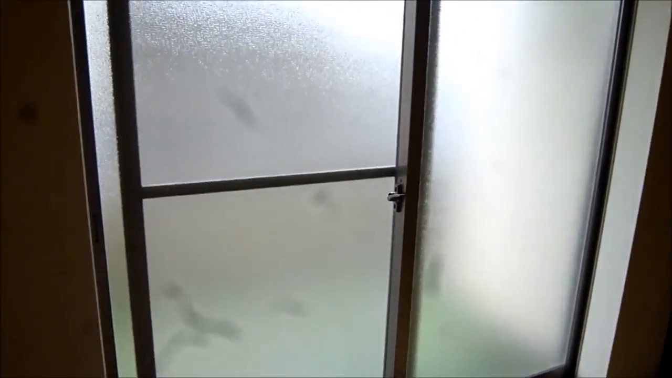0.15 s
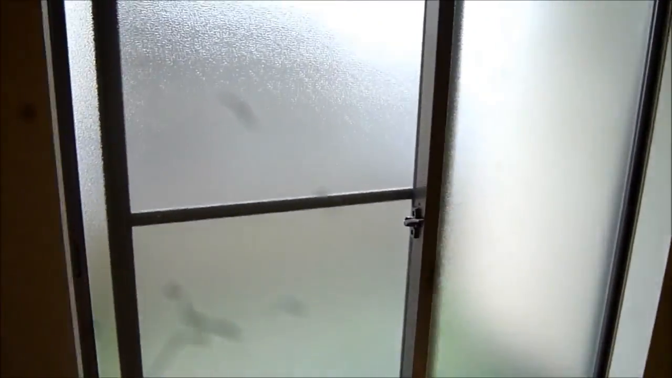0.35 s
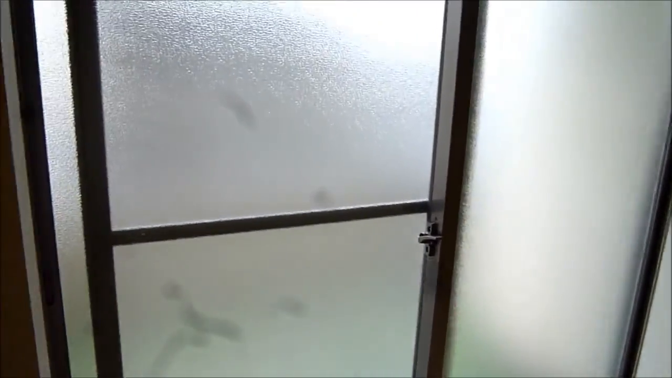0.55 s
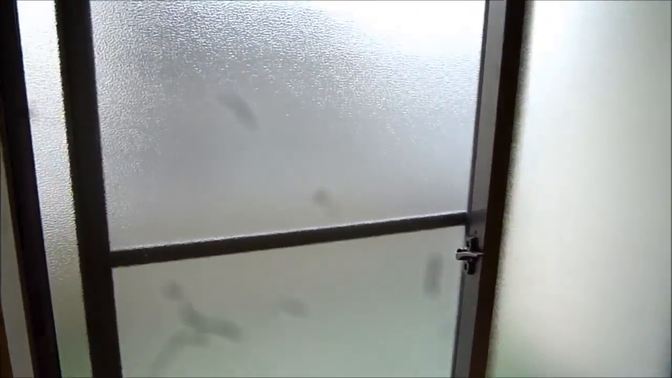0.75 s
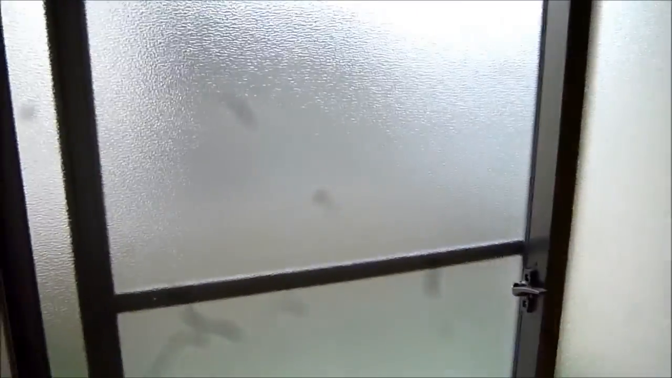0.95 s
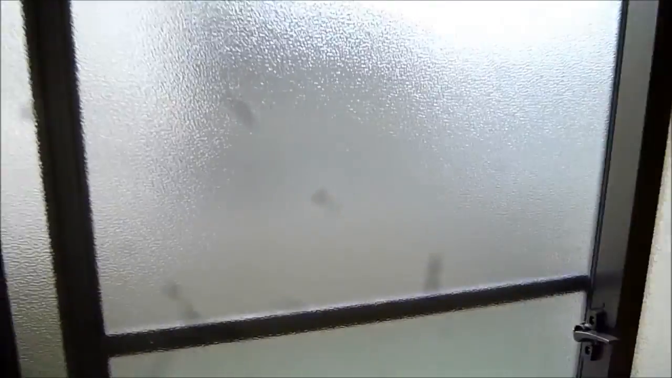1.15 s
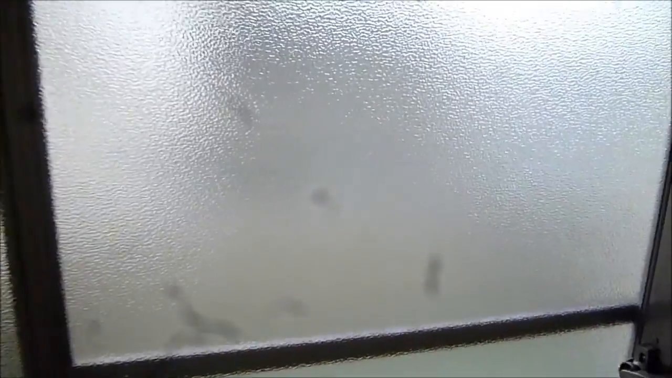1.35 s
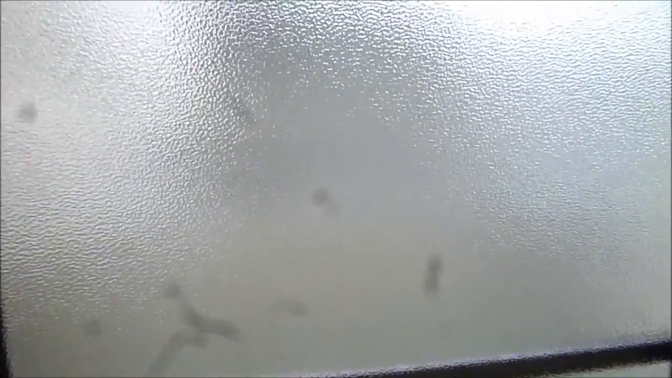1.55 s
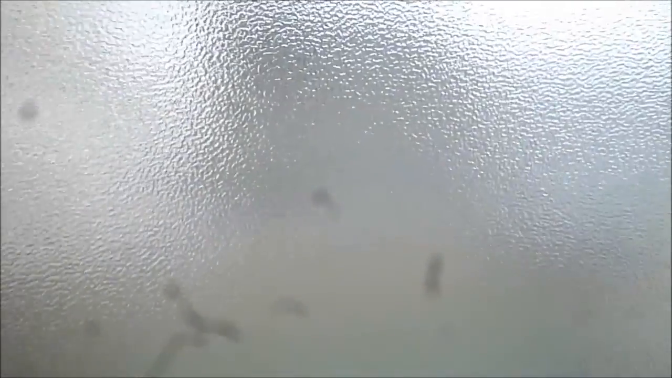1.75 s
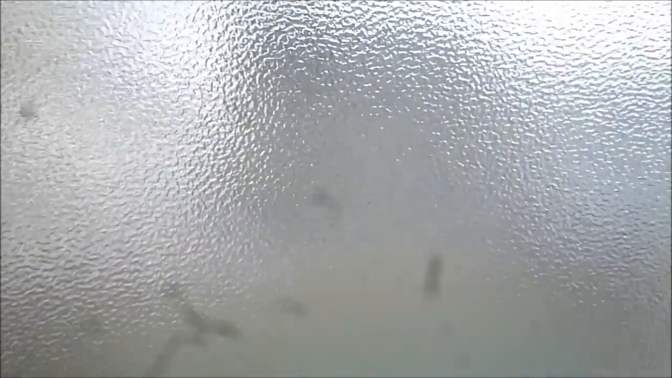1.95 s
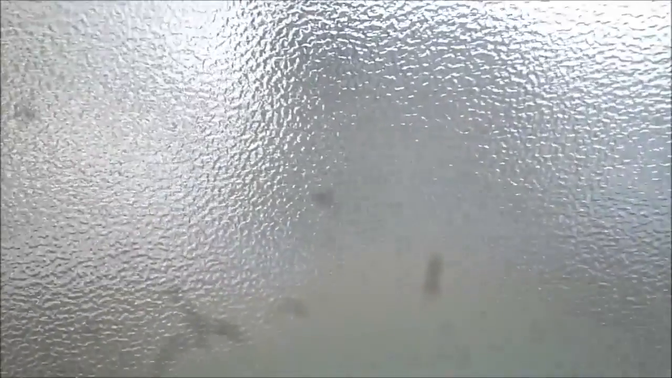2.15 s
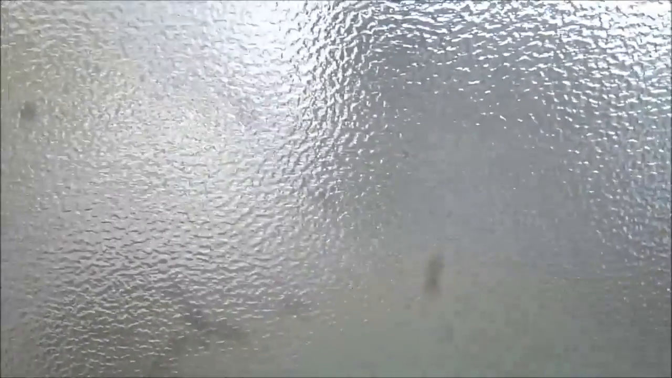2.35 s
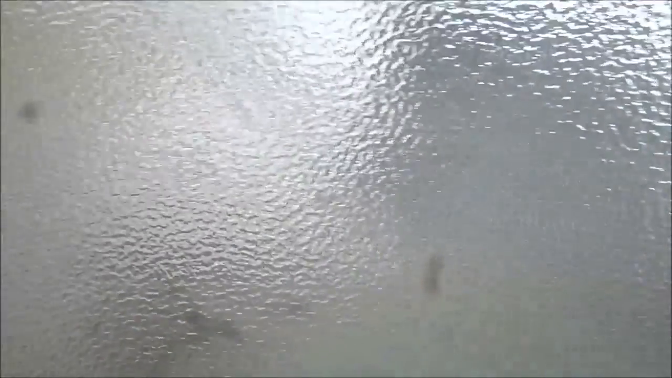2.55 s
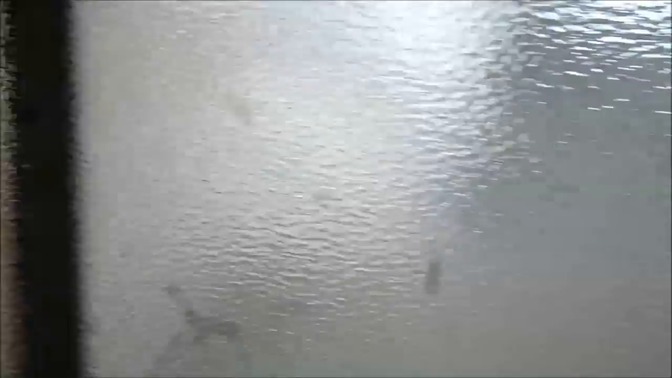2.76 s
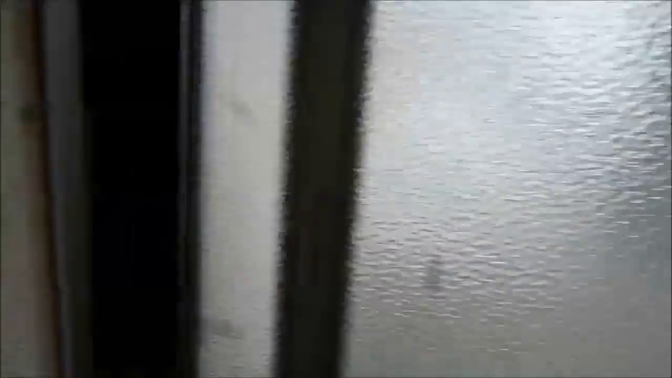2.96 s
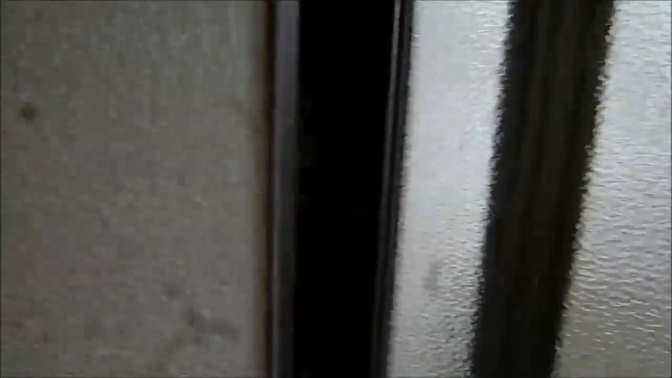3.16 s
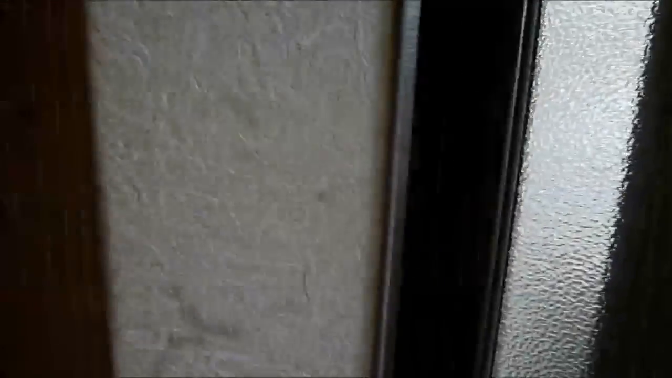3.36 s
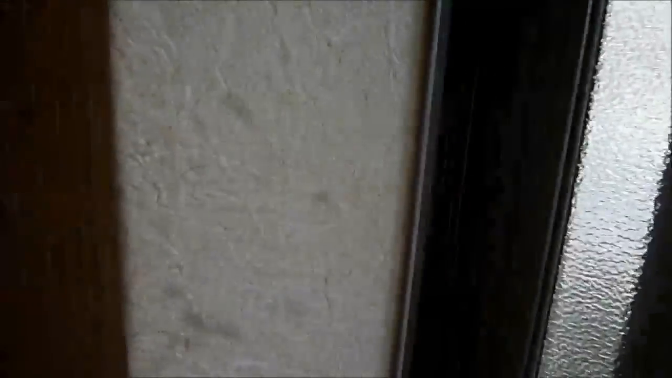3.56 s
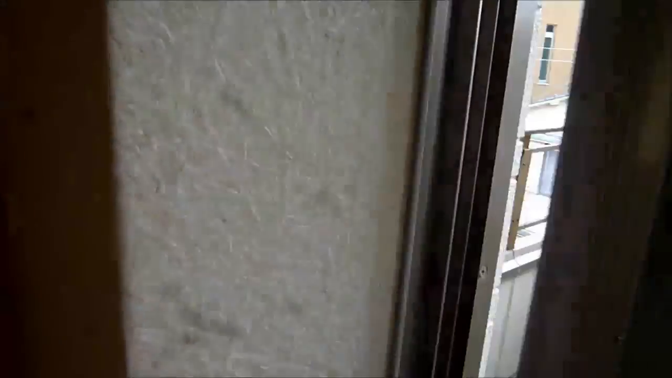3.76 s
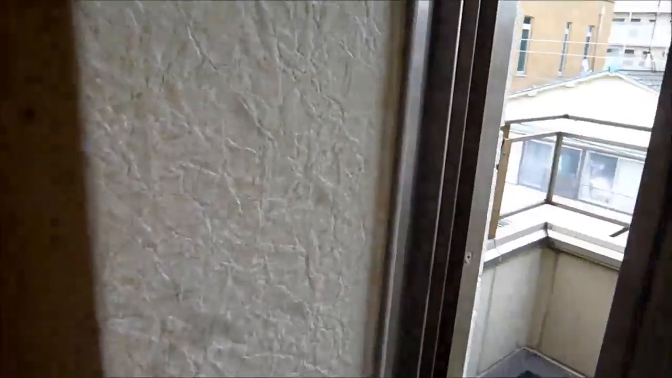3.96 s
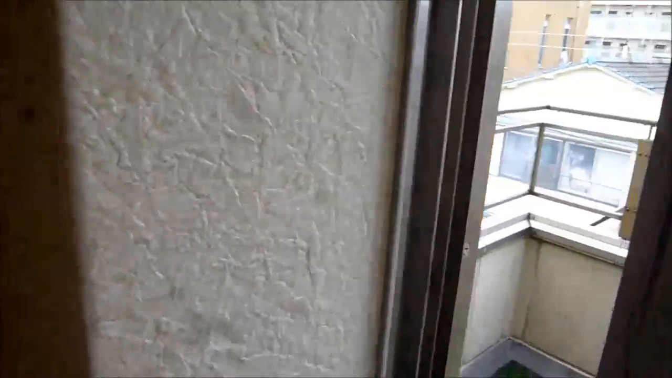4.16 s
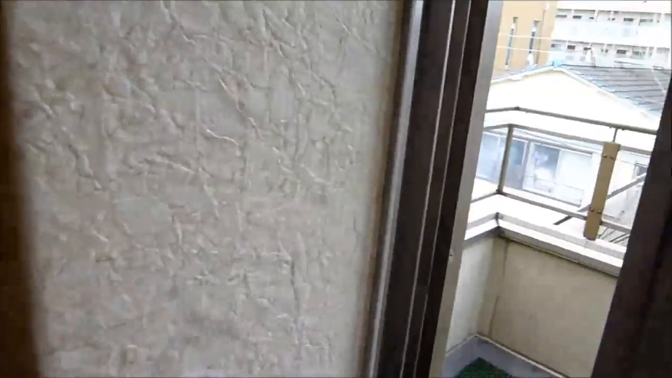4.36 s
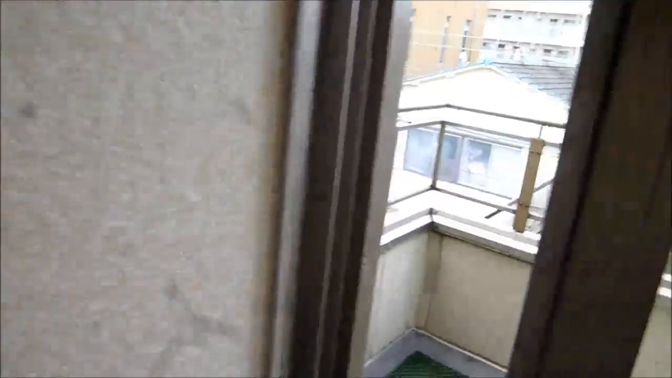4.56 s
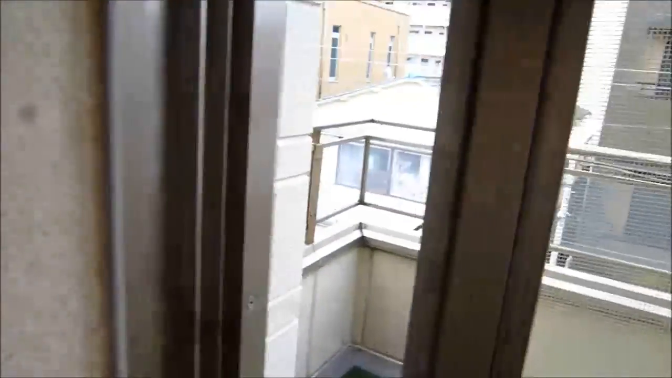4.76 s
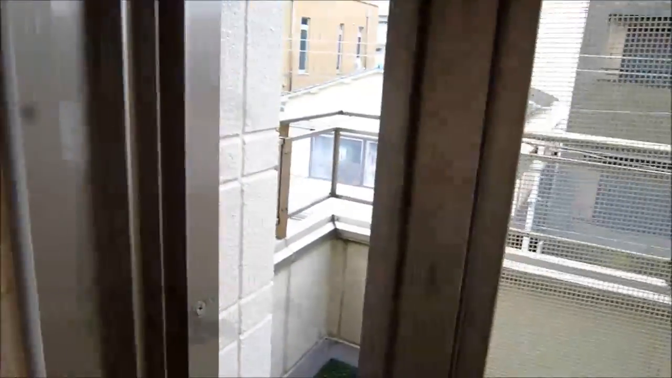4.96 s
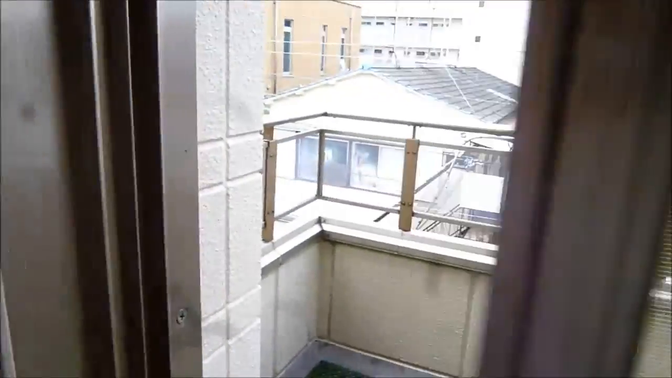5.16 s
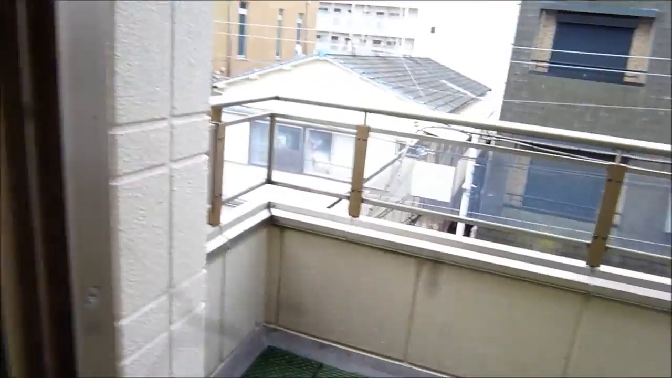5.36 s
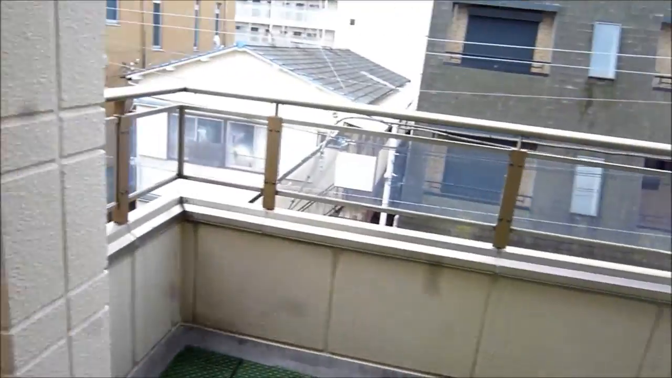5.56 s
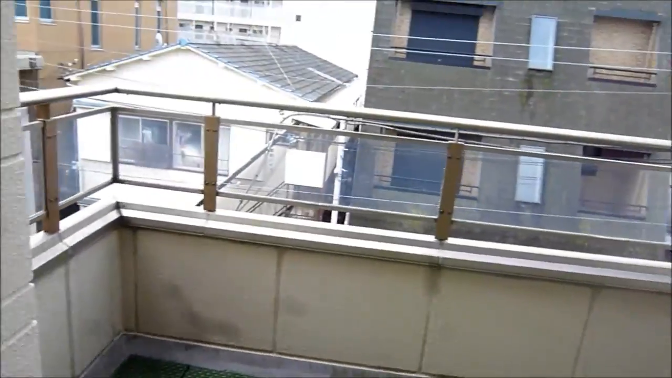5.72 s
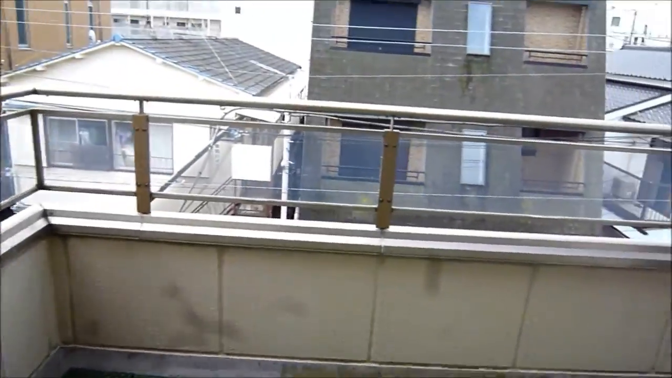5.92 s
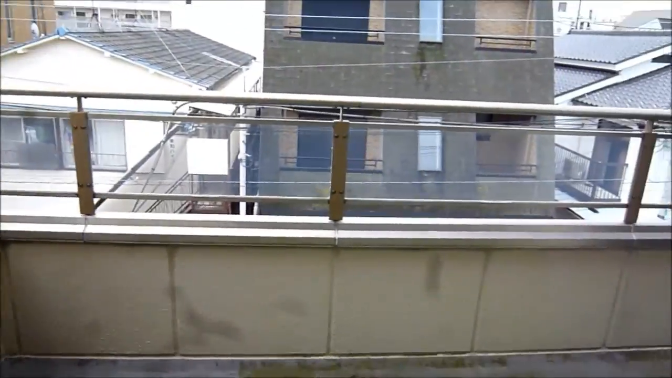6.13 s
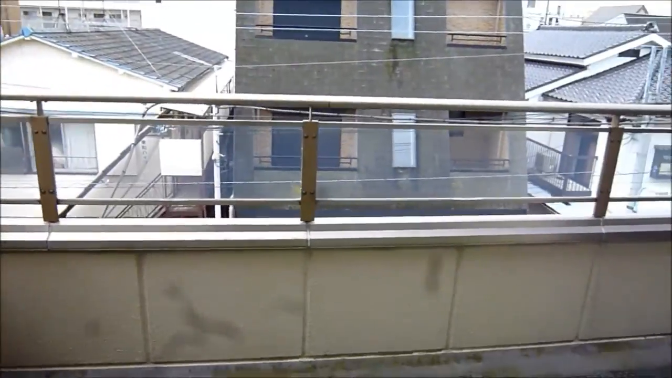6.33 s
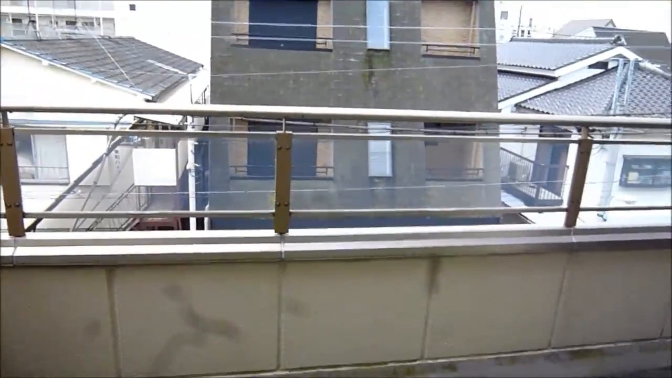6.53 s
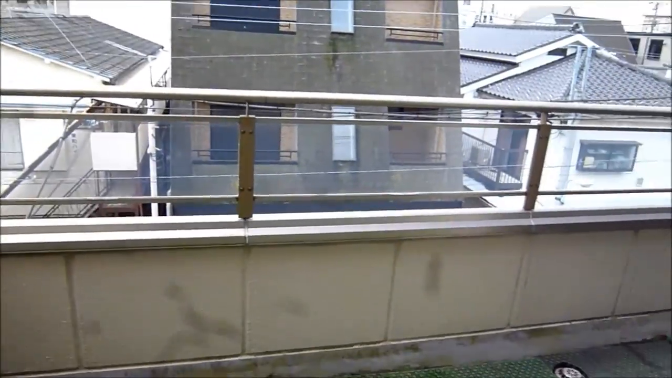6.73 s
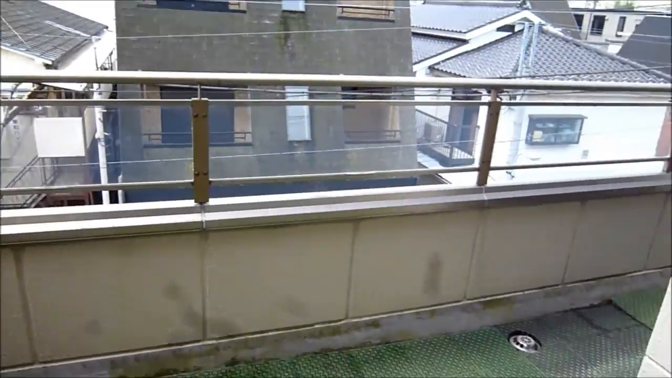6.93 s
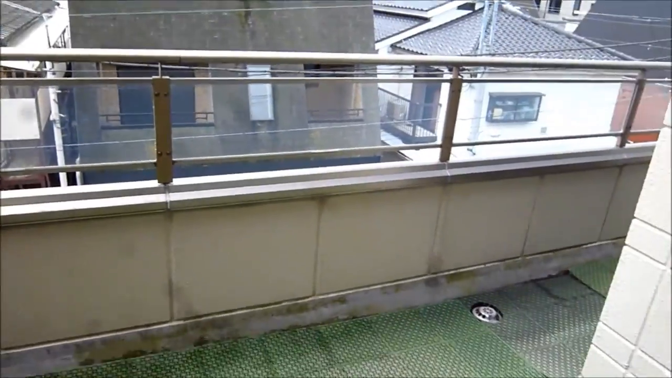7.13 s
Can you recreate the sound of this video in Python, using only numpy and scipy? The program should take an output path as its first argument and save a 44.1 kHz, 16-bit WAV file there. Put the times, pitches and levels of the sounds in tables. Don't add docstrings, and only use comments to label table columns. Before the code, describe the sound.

Soft footsteps and cloth in a quiet room, a sharp metallic latch clack, then a glass door rumbles along its track, squeals and slams open.

```python
import sys
import numpy as np
from scipy import signal
from scipy.fft import rfft, irfft, next_fast_len
from scipy.io import wavfile
from scipy.ndimage import uniform_filter1d

SR = 44100
rng = np.random.default_rng(int(sys.argv[2]) if len(sys.argv) > 2 else 0)


def decibels_to_gain(level_db):
    exponent = np.asarray(level_db, float) / 20
    return 10 ** exponent


def unload_wav(signal):
    wavfile.write(
        sys.argv[1],
        SR,
        np.round(np.clip(np.atleast_2d(signal).T, -1, 1) * 32767).astype(np.int16),
    )


N = 317032


def evened(x):
    return x / np.sqrt(np.mean(x ** 2) + 1e-20)


def read(points, hz):
    f, value = np.transpose(points)
    return np.interp(np.log(hz + 1), np.log(f + 1), value)


def curves(rows, outside=None):
    s, *columns = np.transpose(rows)
    t = np.arange(N) / SR
    return [np.interp(t, s, column, outside, outside) for column in columns]


def add(mix, s, sound):
    part = mix[round(s * SR):][:len(sound)]
    part += sound[:len(part)]


def colour(x, spectrum):
    size = next_fast_len(N)
    gain = decibels_to_gain(read(spectrum, np.fft.rfftfreq(size, 1 / SR)))
    return evened(irfft(rfft(x, size) * gain, size)[:N])


def resonate(x, hz, width_hz):
    r = np.exp(-np.pi * width_hz / SR)
    pole = r * np.exp(2j * np.pi * hz / SR)
    return 2 * signal.lfilter([1 - r], [1, -pole], x).real


def resonate_twice(x, hz, width_hz):
    return resonate(resonate(x, hz, width_hz), hz, width_hz)


def wander(size):
    return evened(uniform_filter1d(uniform_filter1d(rng.standard_normal(N), size), size))


def grit(per_s, spread_db):
    heights = decibels_to_gain(spread_db * np.minimum(rng.exponential(1, N), 4))
    bumps = heights * (rng.random(N) < per_s / SR)
    return rng.standard_normal(N) * (1 + signal.lfilter([1], [1, -.985], bumps))


def power_sum(levels_db):
    return 10 * np.log10(sum(decibels_to_gain(db) ** 2 for db in levels_db))


# (frequency [Hz], density [dB per Hz])
ROOM_TONE = [(18, -108.5), (30, -61.5), (147, -20.5), (258, -9.5), (318, -6), (451, -10), (626, -10),
             (1390, -18), (2010, -24), (7290, -26.5), (8000, -54.5), (10400, -60), (17600, -120)]
# (frequency [Hz], density [dB per Hz])
STREET_AIR = [(18, -87), (30, -62.5), (204, -7.5), (357, -2.5), (869, -7.5), (1630, -24.5), (2110, -34),
              (2550, -25.5), (4780, -19.5), (7120, -30), (8000, -35.5), (10400, -69), (17600, -120)]
ROOM_TONE_DB, STREET_DB = -51, -44.5
OPENS_S, OPENING_S = 3.19, 0.26


def air():
    opened = np.clip((np.arange(N) / SR - OPENS_S) / OPENING_S, 0, 1)
    room_tone = decibels_to_gain(ROOM_TONE_DB) * colour(rng.standard_normal(N), ROOM_TONE)
    street_gain = opened * decibels_to_gain(STREET_DB + 1.2 * wander(size=3000))
    return room_tone + street_gain * colour(rng.standard_normal(N), STREET_AIR)


# (start [s], rise [s], thud level [dB], scuff level [dB], fade [dB per s])
BRUSHES = [(.21, .09, -46, -51, 54), (.42, 0.064, -51.5, -52.5, 102), (.91, 0.013, -47.5, -54.5, 42),
           (.98, 0.022, -52, -53, 80), (1.075, 0.013, -38.5, -40, 99), (1.655, 0.038, -46.5, -52, 50),
           (1.86, 0.045, -52.5, -47.5, 112), (2.06, 0.032, -47.5, -51.5, 50), (2.125, 0.014, -56, -48, 200),
           (2.25, .01, -36, -43.5, 30), (2.39, 0.023, -43.5, -60, 42), (2.5, .07, -41, -46, 81),
           (3.03, 0.1, -46, -44, 79), (3.371, .03, -41.5, -46, 246.5), (3.6, 0.11, -47, -38.5, 64.5),
           (3.88, 0.061, -45.5, -34.5, 55), (4.461, 0.054, -33, -38, 94), (4.751, .02, -33, -42, 54),
           (4.9, .01, -28.5, -37.5, 114), (3.195, 0.012, -47, -60, 150), (5.995, 0.0084, -24.5, -41, 90.5),
           (5.7, 0.47, -52, -33, 115)]
# (time [s], level [dB])
PANEL_SPEEDS = [
    [(3.76, -42), (3.82, -30.5), (3.9, -29), (4.31, -32), (4.57, -36.5), (4.89, -43), (5.0, -38.5),
     (5.1, -65)],
    [(4.88, -65), (5.0, -39.5), (5.2, -28), (5.34, -22.5), (5.45, -23.5), (5.73, -26.5), (6.06, -31.5),
     (6.17, -33.5), (6.38, -45)],
]
BRUSH_SWELL_DB, FLOOR_HUM_DB, SCRAPE_FLOOR_DB = 6, -56.5, -68
SEAL_DB, SETTLE_DB_PER_S = -8, 11


def motion():
    t = np.arange(N) / SR
    thuds_db, scuffs_db = [], []
    for s, rise, thud_db, scuff_db, fade in BRUSHES:
        swell_db = BRUSH_SWELL_DB * ((t - s) / rise - 1)
        fade_db = -fade * (t - s - rise)
        shape_db = np.where(t < s, -120, np.minimum(swell_db, fade_db))
        thuds_db.append(thud_db + shape_db)
        scuffs_db.append(scuff_db + shape_db)
    first_db = curves(PANEL_SPEEDS[0], -120)[0]
    s, db = np.transpose(PANEL_SPEEDS[1])
    second_db = np.interp(t, s, db, -120) - SETTLE_DB_PER_S * np.maximum(t - s[-1], 0)
    speed_db = power_sum([first_db, second_db])
    rumble_db = power_sum([speed_db, FLOOR_HUM_DB] + thuds_db)
    scrape_db = power_sum([speed_db + SEAL_DB, SCRAPE_FLOOR_DB] + scuffs_db)
    return rumble_db, scrape_db


# (frequency [Hz], density [dB per Hz])
RUMBLE = [(24, -79.5), (40, -56.5), (308, 0.5), (426, -4), (802, -4), (894, -1), (1780, -10.5), (2090, -23),
          (3000, -23), (3900, -42.5), (6600, -120)]
# (frequency [Hz], density [dB per Hz])
SCRAPE = [(1350, -50.5), (2300, -3), (2580, -2.5), (2950, 1), (7100, -2.5), (7550, -11.5), (8000, 7),
          (10400, -47.5), (17600, -120)]
# (frequency [Hz], width [Hz], level [dB])
PANE_MODES = [(320, 4.3, 8), (485, 110, -6), (595, 51, 6.5), (678, 15, 9), (839, 13, -15), (1030, 33, -1),
              (1153, 60, 1), (1420, 180, -24)]


def sliding():
    rumble_db, scrape_db = motion()
    shake = colour(grit(per_s=150, spread_db=0.67), RUMBLE)
    modes = sum(decibels_to_gain(db) * resonate(shake, hz, width_hz) for hz, width_hz, db in PANE_MODES)
    rumble = evened(shake + 0.36 * modes) * decibels_to_gain(rumble_db + 1.04 * wander(size=600))
    hiss = colour(grit(per_s=500, spread_db=.2), [(1500, -41)] + SCRAPE)
    return rumble + hiss * decibels_to_gain(scrape_db + 0.56 * wander(size=1500))


# (centre [s], half length [s], level [dB])
DRONE = (5.57, 0.26, -56)
# (centre [s], half length [s], level [dB])
HUM = (5.38, 0.13, -24)
DRONE_HZ, DRONE_WIDTH_HZ, HUM_HZ, HUM_WIDTH_HZ = 94, 16, 888, 30


def rolling():
    t, noise = np.arange(N) / SR, rng.standard_normal(N)
    drone_db, hum_db = (db - 10 * ((t - s) / half) ** 2 for s, half, db in (DRONE, HUM))
    drone = evened(resonate_twice(noise, DRONE_HZ, DRONE_WIDTH_HZ))
    hum = evened(resonate_twice(noise, HUM_HZ, HUM_WIDTH_HZ))
    return decibels_to_gain(drone_db) * drone + decibels_to_gain(hum_db) * hum


def slips(rows, waver, t60_s):
    t, out = np.arange(5000) / SR, np.zeros(N)
    for (s, peak_db, hz), jitter in zip(rows, rng.standard_normal((len(rows), len(t)))):
        pitch_hz = hz * (1 + waver * evened(uniform_filter1d(jitter, size=150)))
        turns = np.cumsum(pitch_hz) / SR
        envelope = decibels_to_gain(peak_db - 60 * t / t60_s) * np.minimum(t / 0.004, 1)
        add(out, s, envelope * np.sin(2 * np.pi * turns))
    return out


# (time [s], level [dB], pitch [Hz])
WHINE = [
    (5.42, -50, 7250),
    (5.67, -31, 7400),
    (5.71, -20, 7250),
    (5.8, -22, 7200),
    (5.92, -28, 7250),
    (5.97, -25, 7400),
    (6.005, -37, 7200),
    (6.16, -33, 7300),
    (6.42, -58, 7300),
]
# (time [s], peak [dB], pitch [Hz])
SLIPS = [(5.5687, -19, 7650), (5.5894, -20, 7150), (5.6999, -9, 7250), (5.7239, -3.5, 7310),
         (5.7324, -6, 7280), (5.7484, -7.5, 7250), (5.7554, -16, 7250), (5.8606, -8.5, 7260),
         (5.8815, -14, 7350), (5.9389, -10, 7450), (5.9464, -9.5, 7450), (5.9594, -6, 7400),
         (5.9674, -12, 7450), (5.9794, -12, 7280), (6.0626, -17, 7070), (6.106, -24, 7250),
         (6.1479, -21, 7430), (6.1534, -15, 7540), (6.1594, -17, 7600), (6.1844, -20, 7100)]
# (time [s], peak [dB], pitch [Hz])
CHIRPS = [
    (6.157, -24, 4620),
    (6.2135, -9.5, 4370),
    (6.2222, -13, 4295),
    (6.2309, -7.5, 4430),
    (6.2385, -8.5, 4314),
]
# (frequency [Hz], level [dB], t60 [s])
BRACKET = [(4247, 0, .18), (4295, -2, .25), (4334, 0, .4), (4382, -2, .45), (4457, -6, .45)]


def runner():
    whine_db, whine_hz = curves(WHINE, -120)[0], curves(WHINE)[1]
    fuzz = decibels_to_gain(whine_db + 3.5 * wander(size=700)) * wander(size=60)
    whine = fuzz * np.sin(2 * np.pi * np.cumsum(whine_hz) / SR)
    chirps = slips(CHIRPS, waver=0.011, t60_s=0.04)
    bracket = sum(decibels_to_gain(db) * resonate(chirps, hz, 1.75 / t60_s) for hz, db, t60_s in BRACKET)
    return whine + slips(SLIPS, waver=.005, t60_s=0.051) + chirps + 1.1 * bracket


# (frequency [Hz], level [dB], t60 [s])
HOOK_MODES = [(5893, 0, .3), (5874, -1, .27), (5886, -15, .8), (3677, -13, .14), (3655, -23, .35),
              (3668, -28, .7), (5733, -8, .05), (6105, -12, .08)]
# (time [s], level [dB])
HOOK_BLOWS = [
    (2.5540, -23),
    (2.6060, -21),
]


def hook():
    t, out = np.arange(SR // 2) / SR, np.zeros(N)
    for s, blow_db in HOOK_BLOWS:
        clock = t + round(s * SR) / SR - HOOK_BLOWS[0][0]
        modes = sum(decibels_to_gain(db - 60 * t / t60_s) * np.cos(2 * np.pi * hz * clock) for hz, db, t60_s in HOOK_MODES)
        add(out, s, decibels_to_gain(blow_db) * modes * np.minimum(t / 0.00076, 1))
    return out * decibels_to_gain(1.3 * wander(size=250))


# (time [s], peak [dB], frequency [Hz], length [s])
SLAM = (5.9943, 1.5, 850, .0048)
THUMP_DB, THUMP_HZ, THUMP_T60_S = -31, 172, 0.19


def slam():
    out, t = np.zeros(N), np.arange(8000) / SR
    s, peak_db, hz, length_s = SLAM
    swell = np.minimum(t / .0025, 1) * decibels_to_gain(-60 * np.maximum(t - length_s, 0) / .007)
    add(out, s, decibels_to_gain(peak_db) * swell * np.sin(2 * np.pi * hz * t))
    wall = resonate(resonate(rng.standard_normal(len(t)), THUMP_HZ, 210), THUMP_HZ, 170)
    add(out, s, decibels_to_gain(THUMP_DB - 60 * t / THUMP_T60_S) * evened(wall))
    return out


# (time [s], click peak [dB], knock level [dB], knock pitch [Hz], click pitch [Hz]) feet and cloth on
TICKS = [(0.28, -44, -40.5, 1280, 2680), (0.4692, -42, -42, 912, 4000), (0.9144, -44, -39, 1300, 4370),
         (0.9921, -29, -46, 490, 2800), (1.074, -20.5, -27, 960, 2740), (1.8876, -29, -43, 1160, 3180),
         (2.071, -32, -43, 1140, 2320), (2.1377, -27.5, -43.5, 580, 4550), (3.1976, -49, -36.5, 524, 3320),
         (3.269, -28, -38, 457, 5000), (6.5294, -34, -43.5, 860, 4500)]
LATCH = [(2.2383, -22, -31.5, 695, 3000), (2.2433, -1.5, -20, 894, 2430), (2.247, -6, -26.5, 965, 3800),
         (2.2666, -12.5, -42, 925, 2600), (2.2992, -41, -25, 873, 2720), (2.394, -22, -36.5, 550, 2500),
         (2.4322, -9, -35, 1270, 6600), (2.4764, -35, -31.5, 930, 3990), (2.5084, -31, -28, 1470, 2690),
         (2.5248, -47, -27, 1385, 2270), (2.5363, -17, -25.5, 1030, 2400), (2.555, -7, -29.5, 1620, 5910),
         (2.5835, -45, -26.5, 1030, 5930), (2.605, -9, -36, 1030, 5890)]
TUGS = [(3.381, -43, -39, 1300, 2620), (3.4357, -24, -22, 1474, 2960), (3.4746, -25.5, -31.5, 1414, 3670),
        (3.5719, -14.5, -28.5, 715, 5400), (3.6041, -39, -32, 960, 4350), (3.6237, -23, -25.5, 1030, 3160),
        (3.6642, -20, -31, 916, 2900), (3.677, -11.5, -34, 1055, 5530), (3.6912, -14, -37, 1070, 5630),
        (3.705, -4.5, -41.5, 1030, 6500), (3.7176, -3.5, -22.5, 1070, 5000), (3.742, -27, -28, 957, 5440),
        (3.793, -18.5, -34, 954, 3880), (3.8025, 1.5, -8.5, 984, 2500), (3.8413, -2, -11, 1034, 2580),
        (3.8647, -29, -16, 1060, 2510)]
JOLTS = [(3.94, -22, -22, 1030, 3360), (3.9944, -15, -25, 724, 2540), (4.041, -14, -21, 1097, 4600),
         (4.0775, -14, -20, 774, 3320), (4.0842, -6, -21.5, 1210, 4900), (4.097, -9, -16.5, 1150, 6600),
         (4.2169, -21, -22.5, 1030, 2650), (4.3007, -11, -23.5, 622, 4400), (4.354, -17.5, -30, 904, 4100),
         (4.4075, -21, -38, 1200, 3700), (4.4788, -13, -25, 1030, 2580), (4.5185, -12, -35, 900, 3200),
         (4.5504, -21.5, -26.5, 608, 3820), (4.7586, -7.5, -23.5, 677, 2930),
         (4.788, -14, -27.5, 1140, 3100), (4.906, -10, -21.5, 1255, 2450), (5.0178, -14.5, -56, 1350, 5100),
         (5.1202, -14.5, -21.5, 1265, 3530), (5.1797, -15, -28, 1140, 3290), (5.23, -7, -22, 1132, 2840),
         (5.2853, -8, -25.5, 834, 3400), (5.5214, -14.5, -18.5, 1760, 3440),
         (5.8802, -8.5, -28.5, 600, 3200), (5.9903, -1.5, -10, 768, 3510)]
REBOUNDS = [
    (6.005, -24, -15, 1407, 5540),
    (6.0108, -19, -25, 1030, 3420),
]
CONTACT_S, FRAME_HZ, FRAME_WIDTH_HZ = 0.0034, 2570, 95


def knocks():
    t, cracks, rings = np.arange(3000) / SR, np.zeros(N), np.zeros(N)
    blows = TICKS + LATCH + TUGS + JOLTS + REBOUNDS
    noise = rng.standard_normal((len(blows), 2, len(t)))
    contact = t / CONTACT_S * np.exp(1 - t / CONTACT_S)
    for (s, click_db, knock_db, knock_hz, click_hz), (a, b) in zip(blows, noise):
        crack = evened(a + 2 * resonate(a, click_hz, 500)) * contact ** 1.45
        add(cracks, s + 0.00151 - CONTACT_S, decibels_to_gain(click_db - 13) * crack)
        rattle = evened(resonate(resonate(b, knock_hz, 1300), knock_hz, 1800))
        ring = np.sin(2 * np.pi * knock_hz * t) + .65 * rattle
        add(rings, s + 0.001546 - CONTACT_S, decibels_to_gain(knock_db - .5) * ring * contact ** 1.35)
    cracks = signal.lfilter(*signal.butter(2, [2000, 7000], "band", fs=SR), cracks)
    return rings + cracks + 0.5 * resonate(cracks, FRAME_HZ, FRAME_WIDTH_HZ)


# (frequency [Hz], t60 [s])
ROOM_DECAY = [(100, 1), (500, 0.27), (1500, 0.34), (4000, 0.41), (8000, 0.2)]


def room(x):
    taps = np.zeros(SR // 2)
    at = np.arange(200, len(taps) - 20, 20)
    taps[at + rng.integers(0, 20, len(at))] = rng.choice([-1., 1.], len(at))
    hz, t, z = signal.stft(taps, SR, nperseg=256)
    decay = decibels_to_gain(-60 * t / read(ROOM_DECAY, hz)[:, None])
    tail = signal.istft(z * decay, SR, nperseg=256)[1]
    return signal.fftconvolve(x, tail / np.linalg.norm(tail))[:N]


BASS_HZ = 200


def scene():
    hits, squeaks, ring, stop = knocks(), runner(), hook(), slam()
    hits = signal.sosfilt(signal.butter(3, BASS_HZ, "high", fs=SR, output="sos"), hits)
    tail = room(decibels_to_gain(-7) * hits + decibels_to_gain(-9.5) * squeaks + decibels_to_gain(-13) * ring + decibels_to_gain(-16) * stop)
    mono = hits + squeaks + ring + stop + tail + sliding() + rolling() + air()
    return np.array([mono, mono])


def low_pass(x):
    return signal.sosfilt(signal.butter(12, 8180, fs=SR, output="sos"), x)


NOTCH_HZ, NOTCH_WIDTH_HZ, EDGE_HZ = 2114, 576, 7780


def record(dry):
    turn = np.array([2j, -2j]) * np.pi * NOTCH_HZ
    zeros, poles = (np.poly(np.exp((turn - np.pi * width_hz) / SR)).real for width_hz in (40, NOTCH_WIDTH_HZ))
    notched = signal.lfilter(zeros, poles, dry)
    edge = signal.firwin(241, EDGE_HZ, window=("kaiser", 10), fs=SR)
    narrow = signal.oaconvolve(notched, edge[None], "same")
    return low_pass(np.clip(narrow, -1, 1))


dry = scene()
out = record(dry)
unload_wav(out)
```